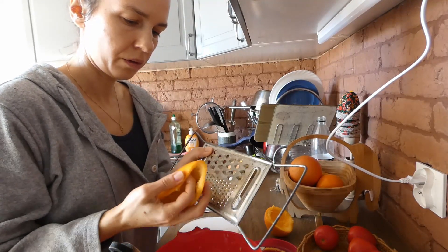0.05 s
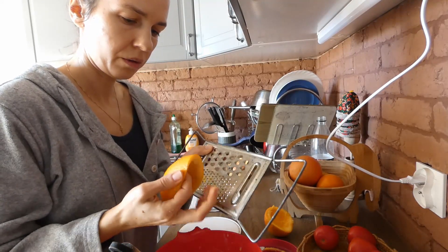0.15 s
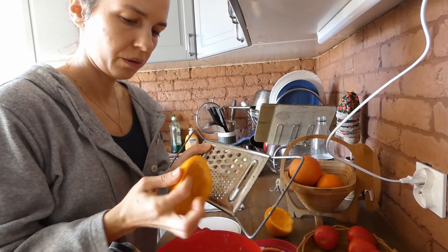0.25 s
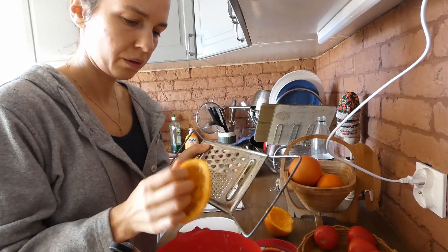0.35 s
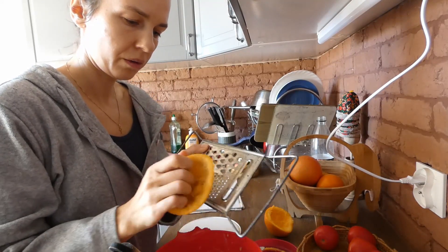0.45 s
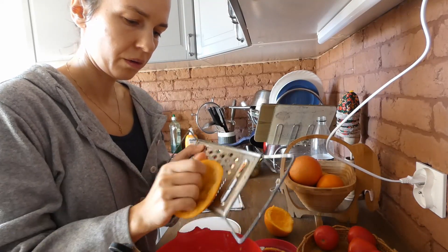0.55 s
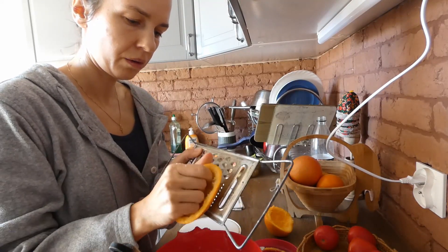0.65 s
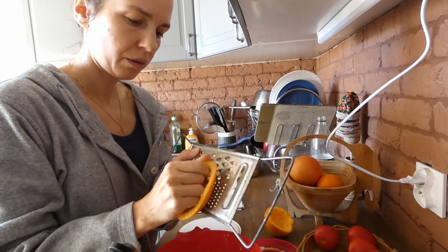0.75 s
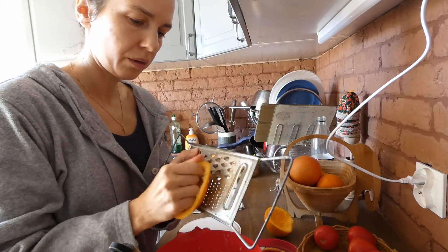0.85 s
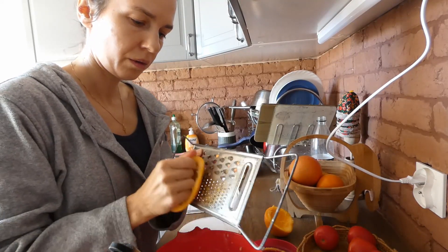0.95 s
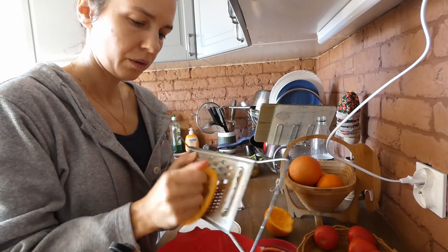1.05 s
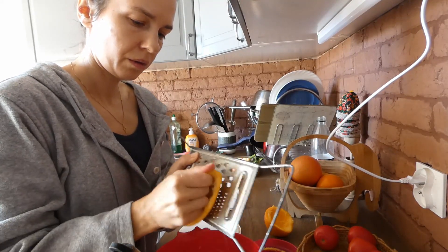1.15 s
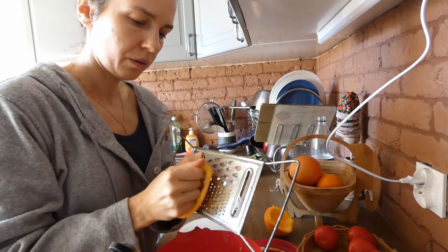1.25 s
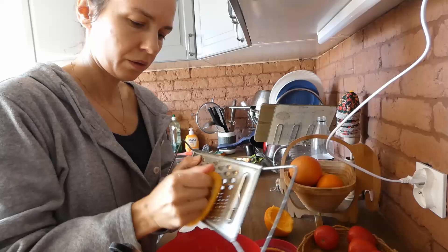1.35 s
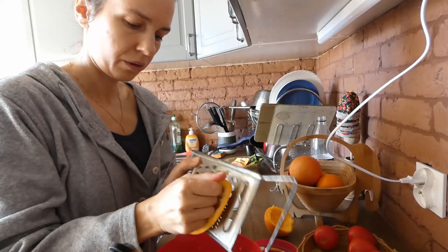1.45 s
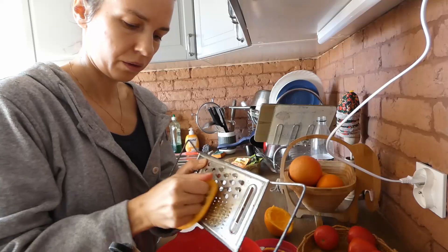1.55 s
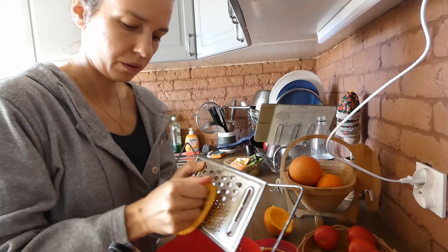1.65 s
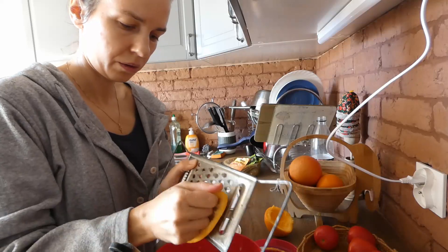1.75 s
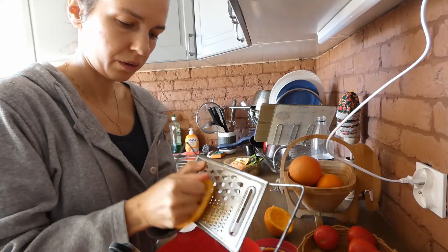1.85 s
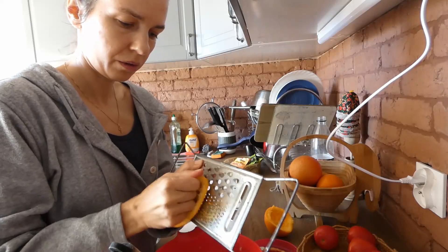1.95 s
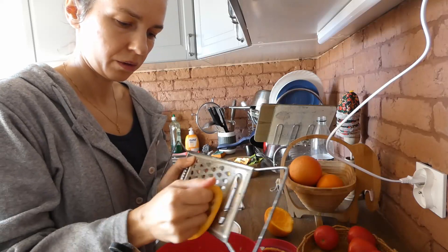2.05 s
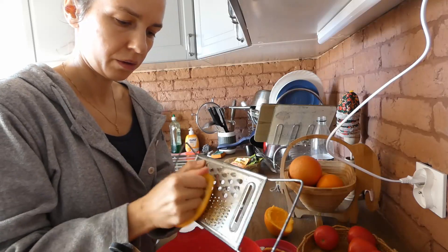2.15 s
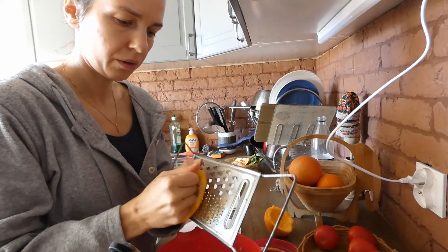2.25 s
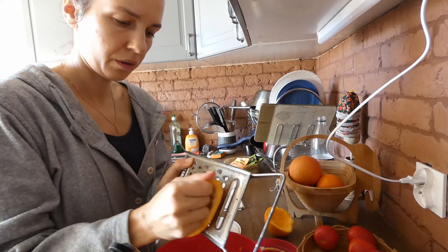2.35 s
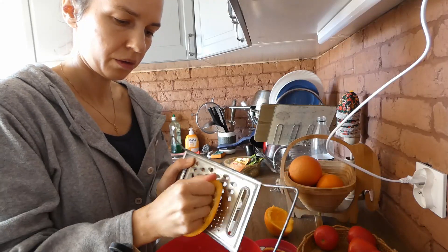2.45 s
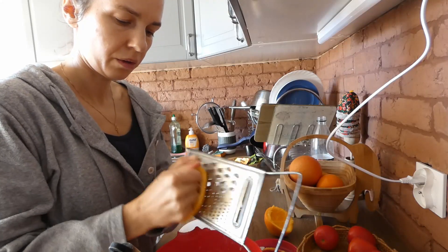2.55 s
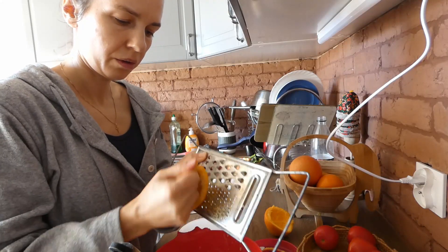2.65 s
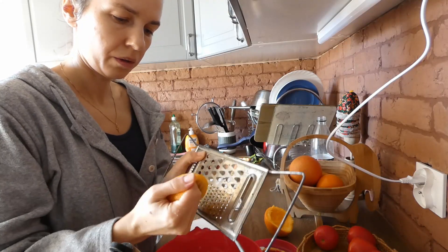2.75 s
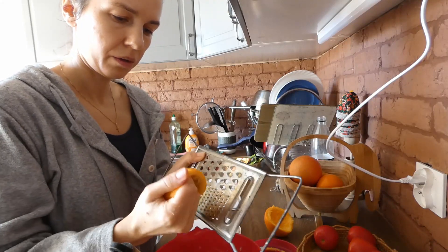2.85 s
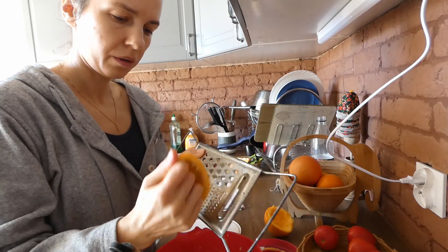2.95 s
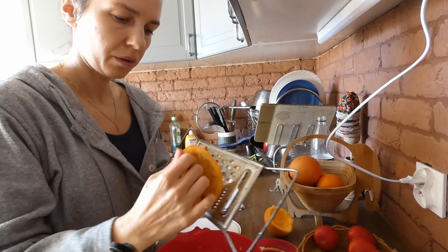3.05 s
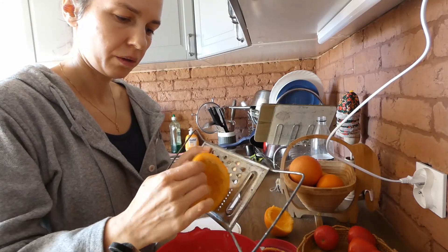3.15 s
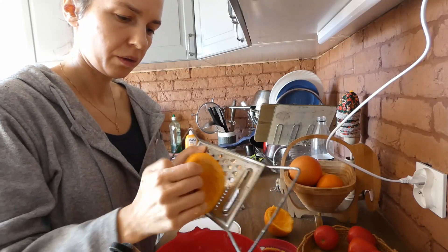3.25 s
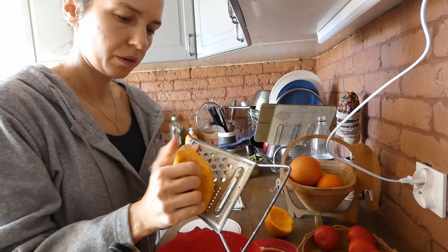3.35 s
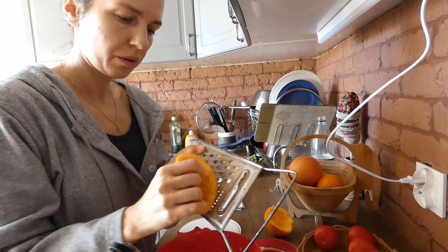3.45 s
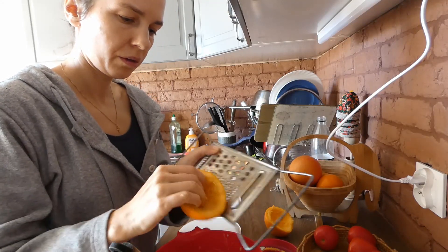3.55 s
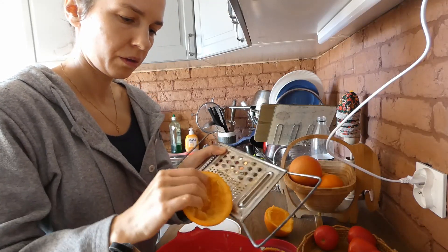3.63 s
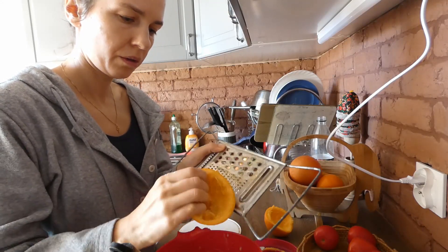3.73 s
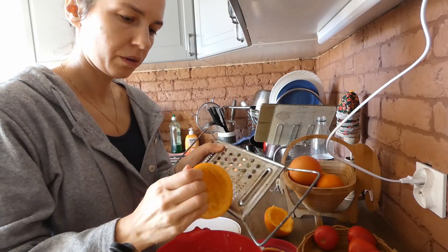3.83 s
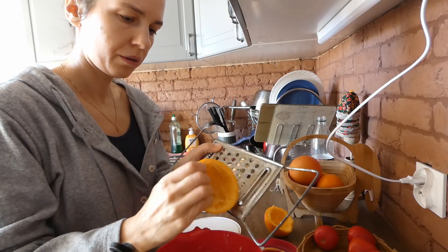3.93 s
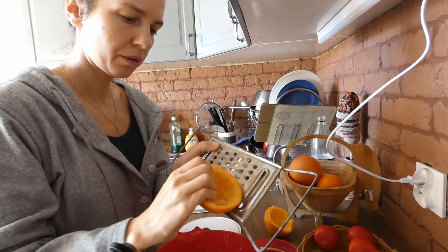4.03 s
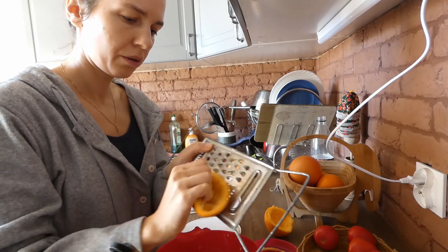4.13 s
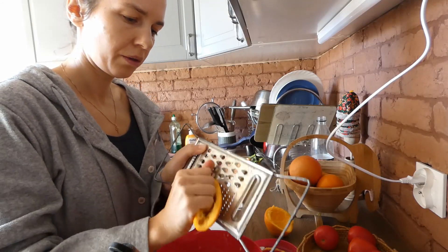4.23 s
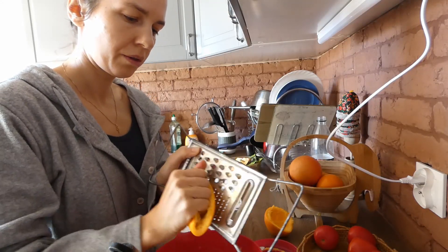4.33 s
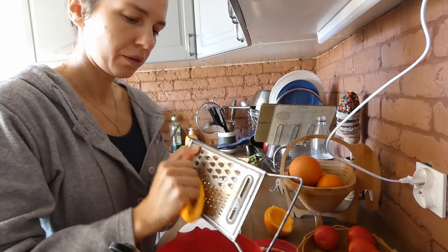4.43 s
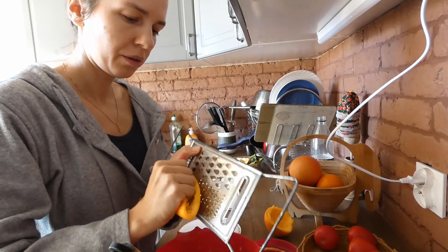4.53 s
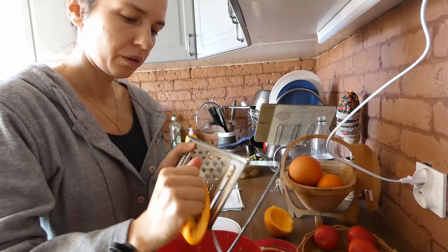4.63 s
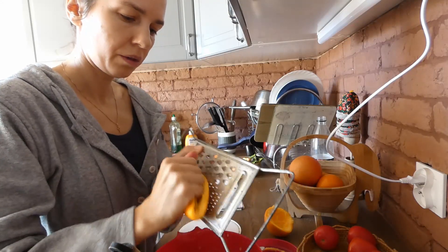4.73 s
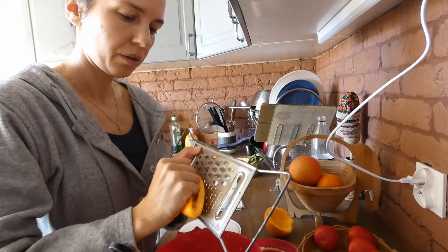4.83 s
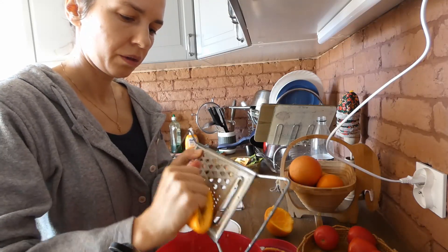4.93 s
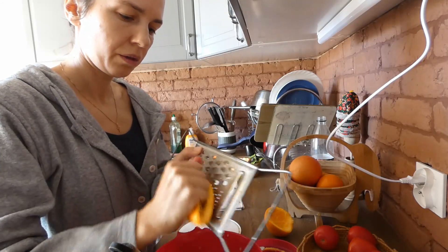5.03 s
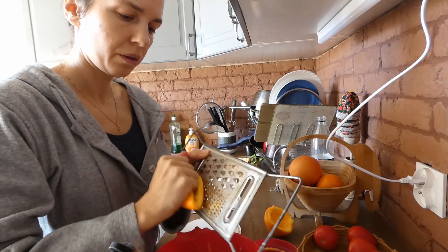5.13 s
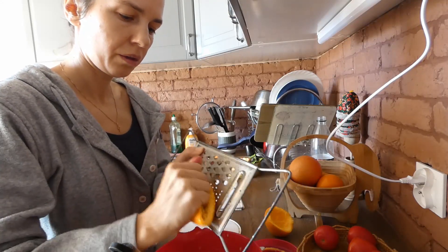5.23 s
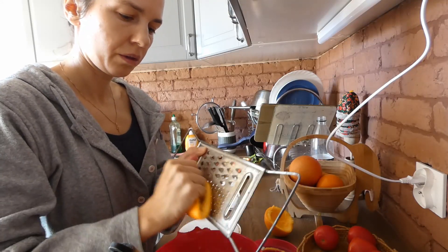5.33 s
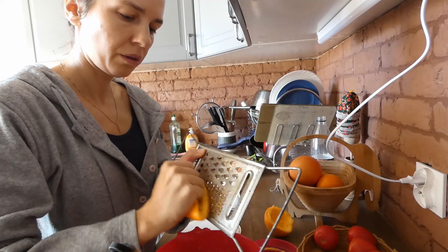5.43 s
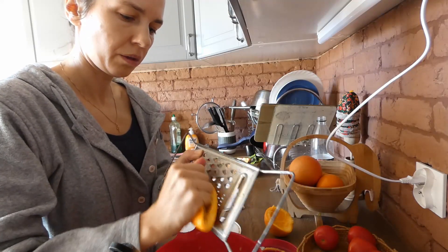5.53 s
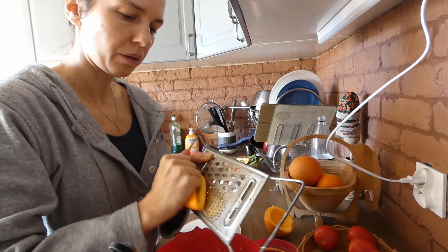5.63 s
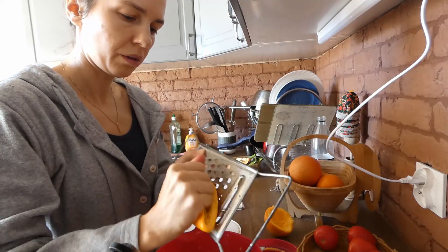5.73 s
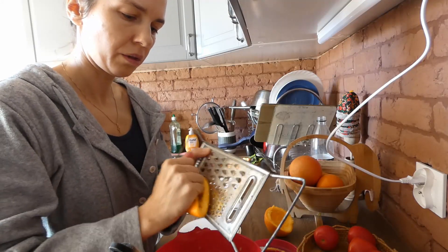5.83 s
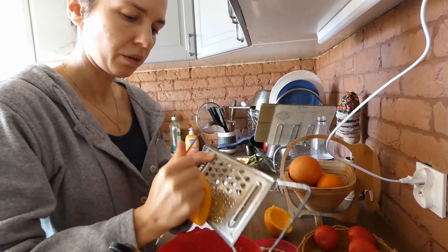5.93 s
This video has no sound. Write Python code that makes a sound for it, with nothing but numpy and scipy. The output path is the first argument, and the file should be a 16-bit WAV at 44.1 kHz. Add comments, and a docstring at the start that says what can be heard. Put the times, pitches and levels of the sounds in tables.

```python
"""A small tiled kitchen: half an orange is zested on a hand-held steel box grater in two bouts of strokes.
Teeth stick and slip on the peel; the slips rasp, drum the box modes and ring the toothed plate.
Snagged teeth rip free with a burst of noise and a flick of the plate.
Before each bout the fruit is turned with a rustle and damp ticks; soft bumps sound the low box modes.
Faint air noise and hum lie beneath; a decaying noise tail makes the room."""
import sys
import numpy as np
from scipy import signal
from scipy.fft import rfft, irfft
from scipy.io import wavfile
from scipy.ndimage import uniform_filter1d

SR = 44100
rng = np.random.default_rng(int(sys.argv[2]) if len(sys.argv) > 2 else 0)


def put_to_file(sound):
    """Save the sound as 16-bit audio at rate SR, in the file named by the first command-line argument."""
    columns = np.atleast_2d(sound).T  # one column per channel
    safe = np.clip(columns, -1, 1)
    whole_steps = np.round(safe * 32767)
    wavfile.write(sys.argv[1], SR, whole_steps.astype(np.int16))


N = 264159
TIME = np.arange(N) / SR  # s
OPPOSED = np.array([[1], [-1]])  # opposite sign in left and right


def undb(db):
    """Decibels to gain."""
    return 10 ** (np.asarray(db) / 20)


def unit(x):
    """Scale to rms 1."""
    return x / np.sqrt(np.mean(x ** 2))


def crest(x):
    """Scale to peak 1."""
    return x / np.max(np.abs(x))


def unit_energy(response):
    """Scale a response to energy 1."""
    return response / np.linalg.norm(response)


def add(track, start_s, sound):
    """Mix a short sound in at start_s."""
    first = max(int(start_s * SR), 0)
    track[first:first + len(sound)] += sound[:N - first]


def convolve(x, response):
    """Pass x through a response, keeping its length."""
    return signal.oaconvolve(x, response)[:len(x)]


def butter(x, order, cutoff_hz, kind="low"):
    """Butterworth filter."""
    return signal.lfilter(*signal.butter(order, cutoff_hz, kind, fs=SR), x)


def colour(x, points, size=2048):
    """Causal minimum-phase filter through (Hz, dB) points, built from the cepstrum."""
    hz, db = np.transpose(points)
    bins_hz = np.maximum(np.fft.rfftfreq(size, 1 / SR), 1)
    gain_db = np.interp(np.log(bins_hz), np.log(hz), db)
    cepstrum = irfft(np.log(undb(gain_db)))
    # fold onto positive time
    cepstrum[1:size // 2] *= 2
    cepstrum[size // 2 + 1:] = 0
    return convolve(x, irfft(np.exp(rfft(cepstrum))))


def ring(hz, db, t60_s, size=12000):
    """Impulse response of decaying modes; neighbours swing in opposite senses."""
    t = TIME[:size, None]
    modes = np.cos(2 * np.pi * hz * t) * np.exp(-np.log(1000) * t / t60_s)
    return modes @ (undb(db) * (-1) ** np.arange(len(hz)))


def walk(rate_hz):
    """Smooth random wavering of rms near 1, with rate_hz new values a second."""
    hold = int(SR / rate_hz)
    steps = np.repeat(rng.standard_normal(N // hold + 1), hold)
    return unit(uniform_filter1d(steps, hold)[:N])


def grains(rate_hz, spread_db):
    """Clicks at random moments, of random sign and widely spread size, at rms 1."""
    chance = rng.random(N)
    size = np.minimum(rng.standard_normal(N), 2)
    sign = np.sign(rng.standard_normal(N))
    return unit((chance < rate_hz / SR) * sign * undb(spread_db * size))


# spectrum of still kitchen air: pitch_hz [Hz], level_db [dB, relative]
AIR_SPECTRUM = [(18, -33.5), (30, -19.5), (97, 2), (219, -3), (263, 1.5), (467, -1), (747, -0.5),
                (874, -10.5), (1510, -11.5), (1820, -3.5), (2240, -14), (9680, -24.5), (15500, -29)]
# faint appliance hum: pitch_hz [Hz], waver_hz [new random values/s], level_db [dB rms]
HUM_TONES = [(107, 12, -81.5), (205, 4.5, -76), (455, 5.9, -83.5), (457, 17, -71)]


def air(air_db=-62.0, side_db=-5):
    """Wavering coloured noise, and hum tones whose sine and cosine parts waver independently."""
    mid, side = (unit(colour(rng.standard_normal(N), AIR_SPECTRUM)) * undb(air_db + .8 * walk(25))
                 for _ in range(2))
    hum = np.zeros(N)
    for pitch_hz, waver_hz, level_db in HUM_TONES:
        phase = 2 * np.pi * pitch_hz * TIME
        hum += undb(level_db) * (walk(waver_hz) * np.sin(phase) + walk(waver_hz) * np.cos(phase))
    return mid + hum + undb(side_db) * side * OPPOSED


# left-right difference in the sound off worktop and wall: pitch_hz [Hz], gain_db [dB]
SCATTER_SPECTRUM = [(100, -18), (500, -21.5), (1100, -8), (2400, -11.5), (4500, -16), (8000, -13.5),
                    (10500, -6.5), (13000, -2.5)]


def kitchen(x, t60_s=0.58, treble_t60_s=0.32, tail_db=-11, early_s=0.0066, split_hz=6000, size=26000):
    """Worktop and wall scatter the sound early; the room rings briefly, its treble dying first."""
    t = TIME[:size]
    ears = []
    for noise in rng.standard_normal((2, size)):
        low = butter(noise, 2, split_hz) * undb(-60 * t / t60_s)
        high = butter(noise, 2, split_hz, "high") * undb(-60 * t / treble_t60_s)
        tail = (low - high) * np.minimum(t / 0.0065, 1)  # 6.5 ms fade-in
        ears.append(x + convolve(x, undb(tail_db) * unit_energy(tail)))
    early = rng.standard_normal(size) * t * np.exp(-t / early_s)
    side = colour(convolve(x, unit_energy(early)), SCATTER_SPECTRUM)
    return np.array(ears) + side * OPPOSED


def tick(treble_db, decay_s, size=4000):
    """Sticky skin leaves the peel in one short decaying crackle."""
    noise = rng.standard_normal(size)
    crackle = noise * np.abs(noise) * np.exp(-TIME[:size] / decay_s)
    tone = [(100, -13), (900, -3.5), (2000, -2.5),
            (5000, treble_db - 4), (10000, treble_db - 4), (15000, treble_db - 27.5)]
    return crest(colour(crackle, tone))


# clearest damp ticks of fingers and peel: start_s [s], peak_db [dB, before the room], treble_db [dB trim]
DAMP_TICKS = [(.165, -37.5, -13), (.448, -35, -1.5), (.576, -29, -8), (.703, -38, -19), (2.936, -34, -6),
              (3.062, -35, 10), (3.086, -35.5, -3), (3.349, -43, -4), (3.576, -36.5, -2.5),
              (3.645, -45, 15), (4.035, -38, -5.5), (4.273, -35.5, 33), (4.289, -30.5, 5),
              (4.329, -30.5, 2), (4.393, -27, 0.5), (4.944, -32, .5)]
# rustle level, one list per turn of the fruit: time_s [s], level_db [dB, before wavering]
TURN_LEVELS = [
    [(0.0, -45), (0.032, -47.5), (0.2, -67), (0.5, -64), (0.652, -58.5), (0.8, -56)],
    [(2.98, -66), (3.49, -64.5), (3.896, -73.5), (4.102, -89), (4.24, -59), (4.316, -55), (4.4, -48)],
]


def handling(slide_db=0, tick_s=0.012, faint_rate_hz=9, faint_max_db=-45.5):
    """Fingers and sleeve slide as the fruit is turned: rustling grains, set ticks and random faint ticks."""
    out = np.zeros(N)
    for start_s, peak_db, treble_db in DAMP_TICKS:
        add(out, start_s, undb(peak_db) * tick(treble_db, tick_s))
    slide = colour(grains(rate_hz=2800, spread_db=2), [
        (80, 4.0), (250, 2), (450, 0.5), (900, 10.0), (1300, 1.5),
        (1900, 4.5), (5000, 3.5), (10000, 0.5), (15000, -11.0)])
    motion = np.zeros(N)
    for time_s, level_db in map(np.transpose, TURN_LEVELS):
        motion += undb(np.interp(TIME, time_s, level_db, left=-np.inf, right=-np.inf))
    chance, strength = rng.random((2, N))
    unsticking = (motion > 0) * (chance < faint_rate_hz / SR) * strength
    faint = undb(faint_max_db) * convolve(unsticking, tick(treble_db=15, decay_s=0.0027))
    return out + faint + unit(slide) * motion * undb(slide_db + 4.1 * walk(33))


# box modes: pitch_hz [Hz, unloaded], bump_db [dB under a bump], rub_db [dB under the teeth],
# t60_s [s, without hand damping]
BOX_MODES = [(165, -6, -27, 0.077), (210.3, -7.5, -11, 0.083), (312.4, -2.5, -13, 0.18),
             (381, 3, -5, 0.065), (429.7, 3.5, -4, 0.069), (637, -7.5, -7.5, 0.058), (707, 1.5, -5.5, 0.1),
             (792, 2, 4.5, 0.029), (1006, -3.5, 3.5, 0.034), (1102, -1, 4.5, 0.038), (1275, 0, -3, 0.033),
             (1396, -13, -1.5, 0.066), (1760, -24, 3, 0.032), (1880, -31, -7, 0.14),
             (2123, -28, -1.5, 0.05)]
# soft bumps of the fruit on the box: start_s [s], peak_db [dB, before the room], bright_hz [Hz, low-pass]
FRUIT_BUMPS = [(.016, -19.5, 1210), (0.578, -39, 610.5), (.7, -23.5, 604), (2.934, -22, 1170),
               (4.26, -27, 450)]


def bumps(damp_s=0.099, thud_db=-6, thud_s=0.0048, lowest_hz=110, size=12000):
    """The soft fruit pushes slowly, so mostly low box modes sound, with a dull thud of flesh."""
    out, t = np.zeros(N), TIME[:size]
    pitch_hz, bump_db, _, t60_s = np.transpose(BOX_MODES)
    for start_s, peak_db, bright_hz in FRUIT_BUMPS:
        noise = rng.standard_normal(size)
        thud = butter(noise * np.exp(-t / thud_s), 2, lowest_hz, "high")
        drum = crest(ring(pitch_hz, bump_db, t60_s) * np.exp(-t / damp_s))
        soft = butter(drum + undb(thud_db) * thud, 3, bright_hz)
        add(out, start_s, undb(peak_db) * crest(soft))
    return out


# toothed-plate modes, damped by the peel: pitch_hz [Hz, nominal], level_db [dB], t60_s [s]
PLATE_MODES = [(2060, -10.5, 0.014), (2383, -6, 0.0093), (2693, 2, 0.0084), (2963, 2, 0.0084),
               (3102, -2, .014), (3346, -18, 0.023), (3710, -16, .02)]
# spectrum of tearing peel: pitch_hz [Hz], level_db [dB]
RASP_SPECTRUM = [(40, -25.5), (110, -10), (300, -10.5), (1000, -6), (2200, -5), (3200, -1), (4600, 0),
                 (6300, -2), (8000, -4.5), (9900, -3), (12000, -12.5), (15500, -24.5)]
# loudest snagging teeth: start_s [s], level_db [dB peak, before snag_db], plate_db [dB re tearing]
TOOTH_SNAGS = [(.782, -24, 4), (.806, -16.5, 5), (0.871, -12.5, 3.5), (1.278, -16.5, 6),
               (2.404, -17, -21.5), (2.4674, -11, 11), (2.485, -17, 3), (2.537, -14.5, -2), (2.56, -20, 2),
               (2.579, -14.5, 2), (2.593, -16.5, 13), (4.657, -14.5, -15), (5.257, -19, -23),
               (5.356, -23, -18), (5.746, -22, 8)]


def snags(tear_s=0.0056, grip_s=0.01, snag_db=1, size=4000):
    """A caught tooth rips free and flicks the plate, which the peel grips again at once."""
    out, t = np.zeros(N), TIME[:size]
    flick = crest(ring(*np.transpose(PLATE_MODES), size=size) * np.exp(-t / grip_s))
    for start_s, level_db, plate_db in TOOTH_SNAGS:
        noise = rng.standard_normal(size)
        tear = crest(colour(noise * np.exp(-t / tear_s), RASP_SPECTRUM))
        add(out, start_s, undb(level_db + snag_db) * crest(tear + undb(plate_db) * flick))
    return out


def catches(rate_hz=60, hold_s=0.0021, extra_db=-4):
    """At random a tooth digs deeper; the force jumps, then decays as it lets go."""
    chance, depth = rng.random((2, N))
    digs = (chance < rate_hz / SR) * 2 * depth
    return 1 + undb(extra_db) * convolve(digs, np.exp(-TIME[:2048] / hold_s))


def teeth(slip_rate_hz=800, slip_s=0.002, drag=1.1, even_samples=450):
    """Teeth stick and slip over a steady drag; the hand evens out the force from moment to moment."""
    starts = np.abs(grains(slip_rate_hz, spread_db=-3))
    slips = drag + unit(convolve(starts, np.exp(-TIME[:1024] / slip_s)))
    return slips / np.sqrt(uniform_filter1d(slips ** 2, even_samples))


# strokes over the teeth: start_s [s], length_s [s], level_db [dB force, before force_db], direction [down/up]
GRATER_STROKES = [(0, 0.039, -47, "up"), (0.767, 0.16, -32.5, "down"), (0.909, .12, -27.5, "down"),
                  (1.058, 0.1, -38, "up"), (1.21, 0.13, -29.5, "down"), (1.384, 0.11, -38, "up"),
                  (1.518, 0.15, -27, "down"), (1.712, 0.1, -38, "up"), (1.835, 0.15, -26.5, "down"),
                  (2.018, 0.1, -38.5, "up"), (2.144, 0.15, -26.5, "down"), (2.342, 0.11, -35.5, "up"),
                  (2.451, 0.094, -34, "down"), (2.514, 0.2, -27, "down"), (4.42, 0.049, -30.5, "down"),
                  (4.449, 0.12, -29, "down"), (4.621, 0.097, -34, "up"), (4.747, 0.12, -25.5, "down"),
                  (4.967, 0.086, -36, "up"), (5.071, 0.13, -24, "down"), (5.236, 0.098, -32.5, "up"),
                  (5.358, 0.11, -24.5, "down"), (5.505, 0.08, -32, "up"), (5.598, 0.11, -24, "down"),
                  (5.731, 0.089, -31, "up"), (5.832, 0.12, -25.5, "down")]
# down mostly rasps, up mostly drums the box; by direction: press [share of stroke pressing in],
# ease [share easing off], box_db [dB trim], plate_db [dB trim]
STROKE_DIRECTION = {"down": (0.33, 0.5359, -4.5, -.5), "up": (0.32, 0.45, 3.5, 1)}
# shifting grip, tighter in the second bout, interpolated over strokes:
# time_s [s], plate_db [dB trim], plate_tuning [pitch factor], box_db [dB trim]
GRIP_SHIFTS = [(.9, 0, 1.02, 1.5), (1.21, 3.5, 0.97, -1.5), (1.52, 6, 0.98, -1.5), (1.9, 4.5, 1.02, -1.5),
               (2.5, -2, 0.99, -1.5), (4.42, -6.5, 1.01, 0.5), (4.75, -3.5, 0.986, 0),
               (5.35, -7.5, 1.03, -2.5), (5.8, -1, 1.04, .5)]


def grating(box_db=0, plate_db=0, rasp_db=1, force_db=-0.88, choke_db=5, bite=1.07, size=14000):
    """Pressed slips tear peel and drive box and plate; each stroke's contact point retunes their modes."""
    detune, patchy_db = .015, 2  # spread of mode pitch (share) and level
    out, slips = np.zeros(N), teeth() * catches()
    # each slip bursts peel cells and tugs box and plate at many points
    rasp_force, box_force, plate_force = (slips * grains(rate_hz=16000, spread_db=2) for _ in range(3))
    box_hz, _, rub_db, box_t60_s = np.transpose(BOX_MODES)
    plate_hz, mode_db, plate_t60_s = np.transpose(PLATE_MODES)
    grip_s, *grip = np.transpose(GRIP_SHIFTS)
    tearing = colour(signal.unit_impulse(2048), RASP_SPECTRUM)

    def body(hz, db, t60_s):
        load, contact = rng.standard_normal((2, len(hz)))
        return ring(hz * (1 + detune * load), db + patchy_db * contact, t60_s, size=4000)

    for start_s, length_s, level_db, direction in GRATER_STROKES:
        press, ease, box_trim_db, plate_trim_db = STROKE_DIRECTION[direction]
        plate_grip_db, tuning, box_grip_db = (np.interp(start_s, grip_s, column) for column in grip)
        first = max(int(start_s * SR), 0)
        span = slice(first, first + size)
        travel = np.clip((TIME[span] - start_s) / length_s, 0, 1)
        # teeth graze, then bite; pressure holds, then eases
        swell = np.minimum((travel / press) ** bite, (1 - travel) / ease)
        pressure = undb(level_db + force_db) * np.minimum(swell, 1)
        # peel chokes the plate progressively along the stroke
        choking_db = choke_db * (.5 - travel)
        parts = [
            (rasp_force, tearing, rasp_db),
            (box_force, body(box_hz, rub_db, box_t60_s), box_trim_db + box_db + box_grip_db),
            (plate_force, body(plate_hz * tuning, mode_db, plate_t60_s),
             plate_trim_db + plate_db + plate_grip_db + choking_db),
        ]
        for force, response, part_db in parts:
            drive = force[span] * pressure * undb(part_db)
            add(out, start_s, convolve(drive, unit_energy(response)))
    return out


def scene():
    """All grater sounds share the room, a little right of centre; air and hum lie beneath."""
    left, right = kitchen(grating() + snags() + bumps() + handling())
    left = colour(left, [(100, -7.5), (500, -0.5), (1100, -2.5), (2500, 1.36),
                         (4500, -0.2), (8000, -2), (12000, -1.0)])
    return undb(1.0) * np.array([left, right]) + air()


def record(dry, low_hz=55, top_hz=15600):
    """Thin the deep bass and cut the top steeply."""
    thin = signal.sosfilt(signal.butter(2, low_hz, "high", fs=SR, output="sos"), dry)
    return signal.sosfilt(signal.ellip(10, .2, 80, top_hz, fs=SR, output="sos"), thin)


dry = scene()
out = record(dry)
put_to_file(out)
```